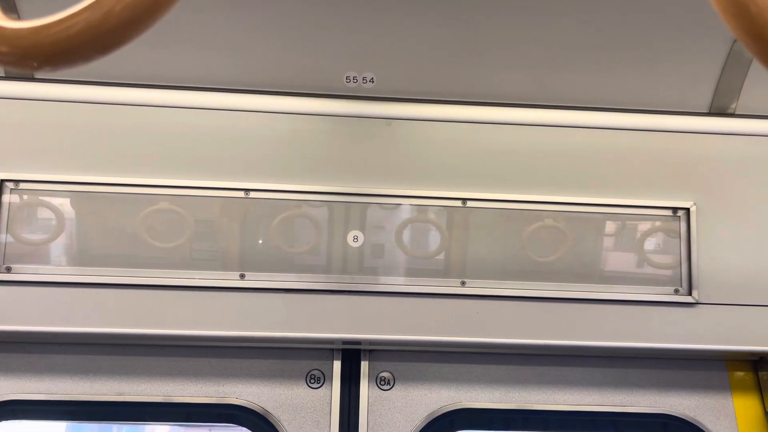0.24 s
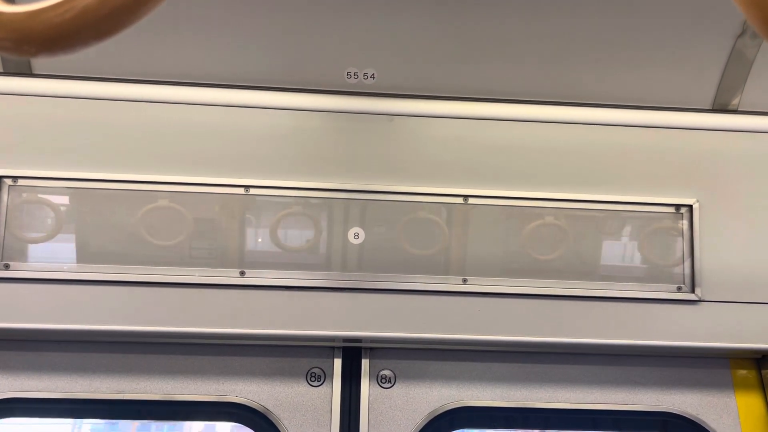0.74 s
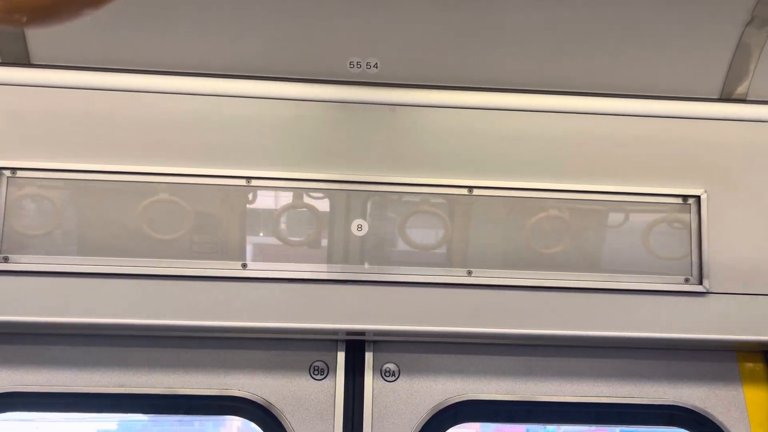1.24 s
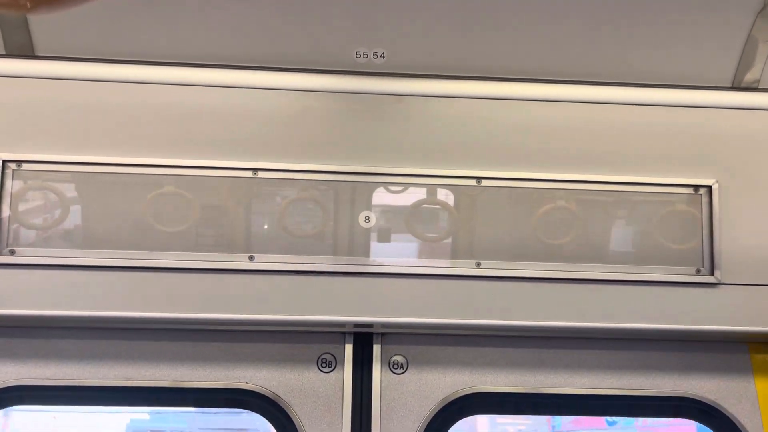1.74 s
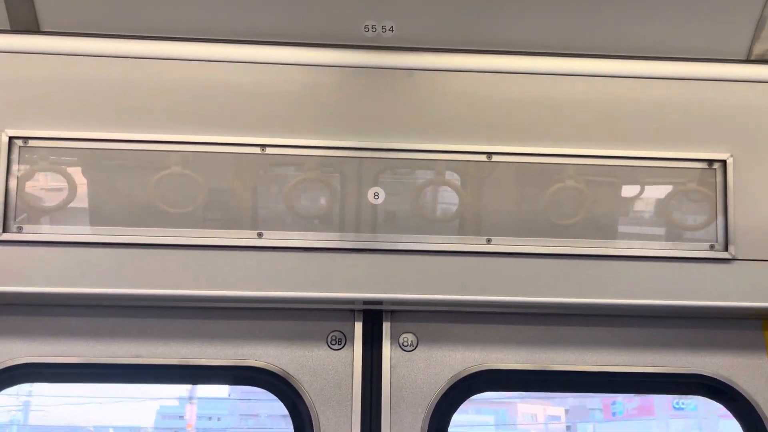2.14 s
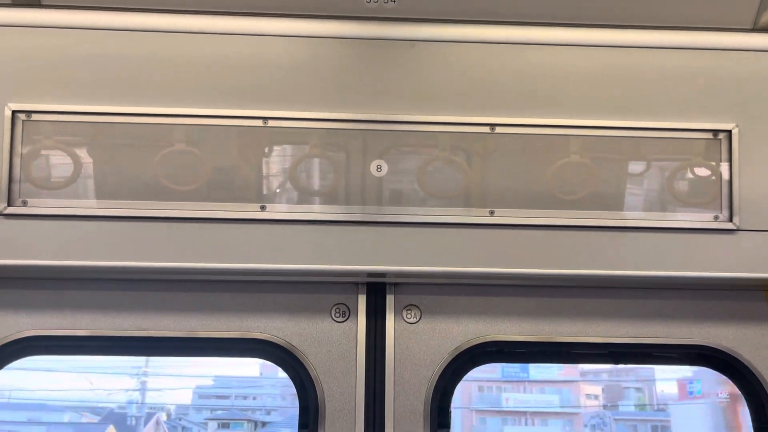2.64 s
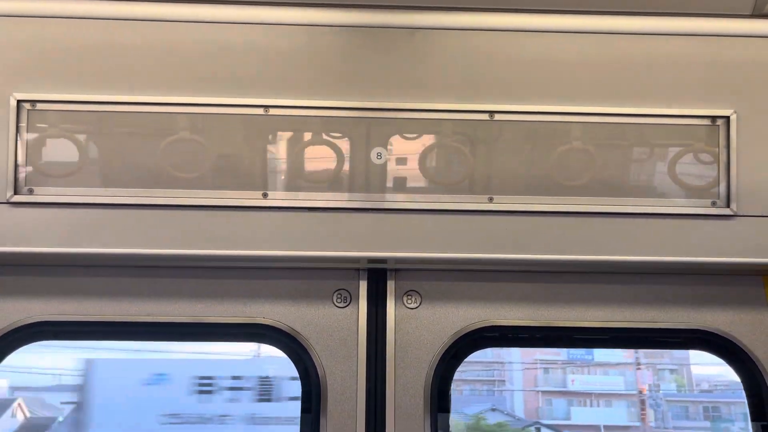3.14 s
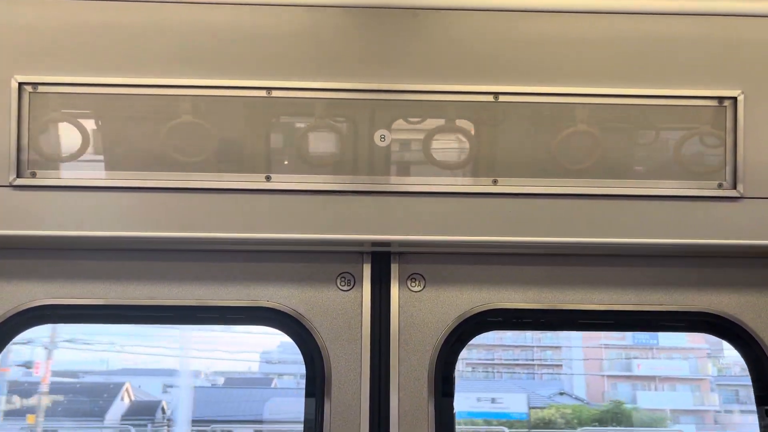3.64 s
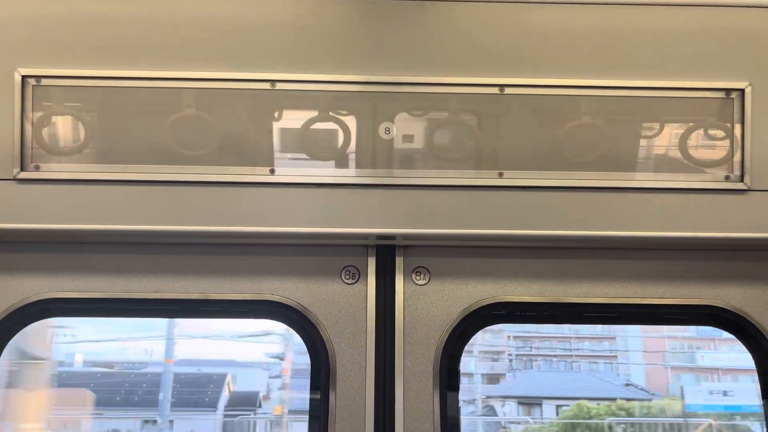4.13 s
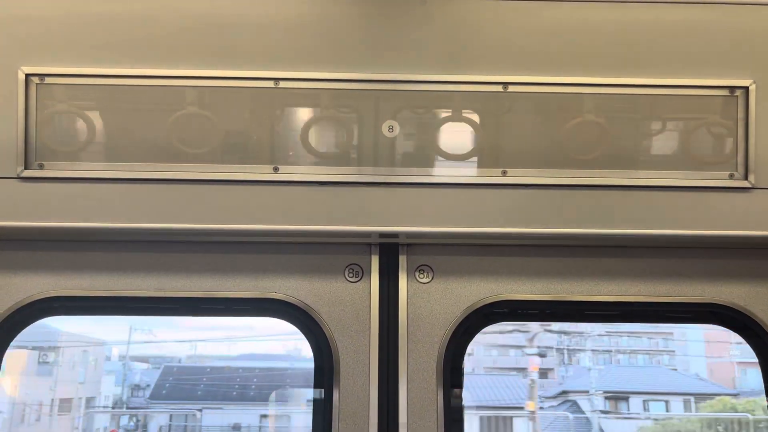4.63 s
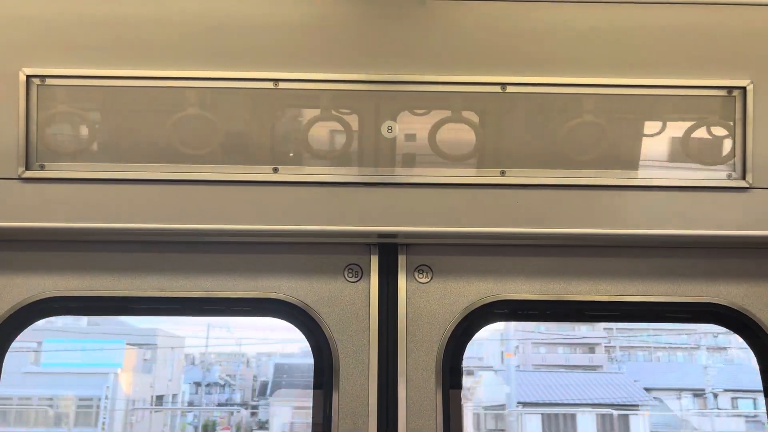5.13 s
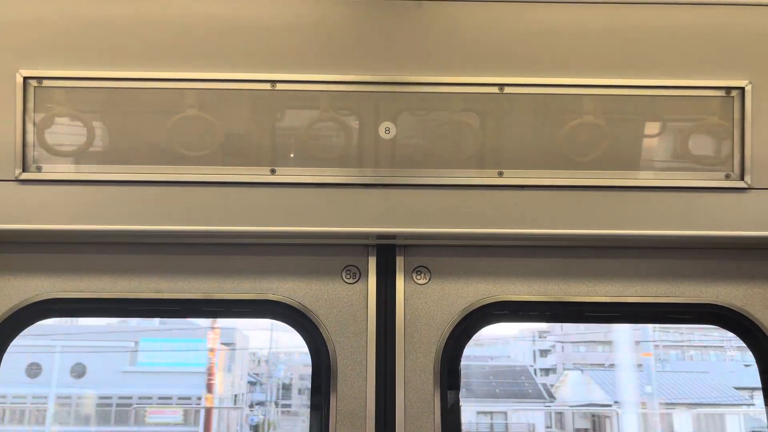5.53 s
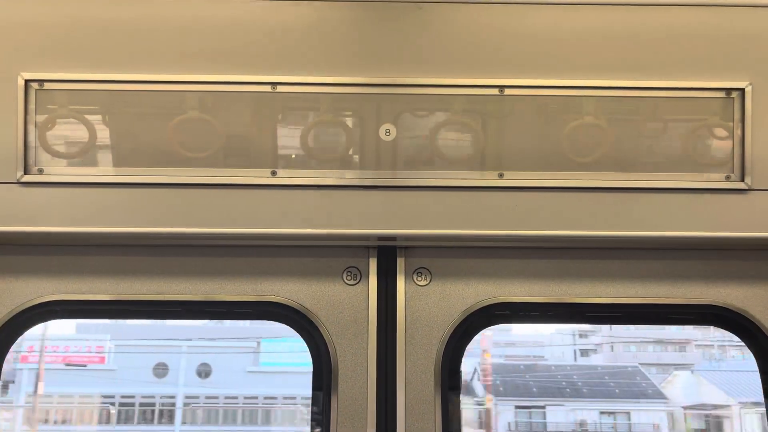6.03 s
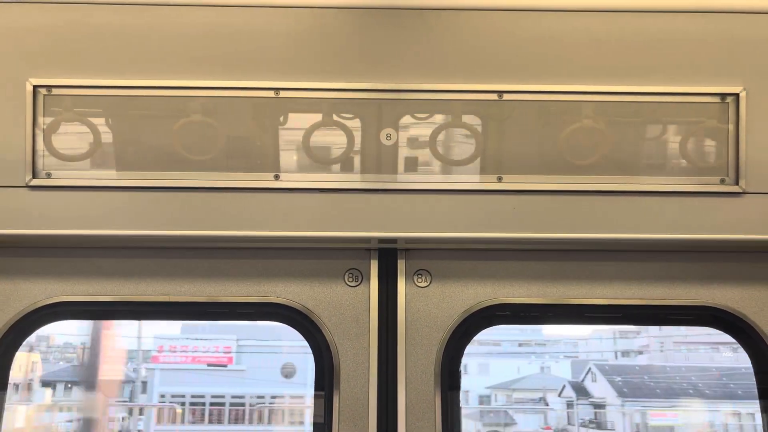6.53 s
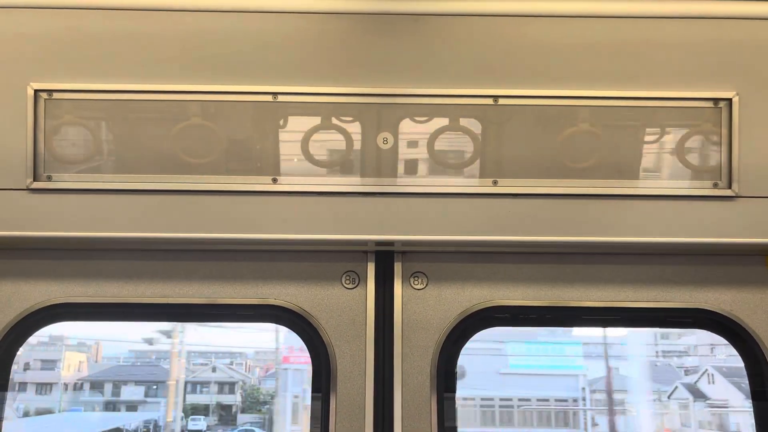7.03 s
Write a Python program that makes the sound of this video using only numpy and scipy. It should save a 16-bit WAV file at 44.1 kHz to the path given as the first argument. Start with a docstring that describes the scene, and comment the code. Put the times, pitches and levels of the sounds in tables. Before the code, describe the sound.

Inside an electric train near the doors, a continuous deep hum around 58 hertz slowly swells and cancels, strongest around 2.4 and 5.5 seconds and weakest near 4.3. Over it, a wavering boom near 100 hertz shakes irregularly, with a strong jolt at 0.7, and wheels roar softly in wide stereo. Dull rail thuds fall at 0.9 and 1.1, faintly again at 5.1. Thin, fluttering hisses appear around 0.8, 1.3 to 1.7, 2.0 to 2.5, 2.8, 3.6 and 4.2 to 4.6, brightening before they die. Tiny metallic clicks cluster with a door rattle near 2.07, then 2.36, 3.9 and 6.8. A faint gear whine climbs steadily, clearer after four seconds. From 5.1 the track roughens: short ringing surges around 5.3, 6.0 and 6.2, then strongest from 6.9 to the abrupt end at 7.3, still rolling.

```python
"""Inside an electric train that gathers speed, by the doors. Two drives beat in a deep, slow hum, a gear whine
climbs, and one wavering tone is the boom of the car body. Filtered noise makes the wheels roar, surge, ring
and swish on the rails, with thin singing strands, a few dull thuds from rail welds, and brief tones that
flare up, mostly towards the end. A thin hiss comes and goes in short spells, ventilation air rushes faintly,
small fittings click now and then, and a door leaf rattles."""
import sys
import numpy as np
from scipy import signal
from scipy.fft import rfft, irfft, next_fast_len
from scipy.io import wavfile
from scipy.ndimage import uniform_filter1d, map_coordinates

SR = 44100
rng = np.random.default_rng(int(sys.argv[2]) if len(sys.argv) > 2 else 0)


def unload_audio(sound):
    """Save the sound as a 16-bit wav file, at the path given as the first command line argument."""
    columns = np.transpose(np.atleast_2d(sound))
    # keep every value between -1 and 1, then stretch to whole-number steps
    steps = np.round(np.clip(columns, -1, 1) * 32767)
    wavfile.write(sys.argv[1], SR, steps.astype(np.int16))


N = 320607

# left-right correlation of the noise: pitch_hz, correlation (-1 to 1)
LEFT_RIGHT_CORRELATION = [(60, 1), (125, 0.88), (250, 0.64), (400, 0.52), (700, .05), (1400, .08),
                          (2800, .27), (5000, 0.32), (6500, .15), (7700, -.65), (8700, -.7), (9700, .1),
                          (11500, .5), (14000, .4)]
# how rough the track is: time_s, roughness (0-1)
TRACK_ROUGHNESS = [(0, 0.16), (4.6, 0), (5.2, 0.4), (5.8, 0.3), (6.7, 0.4), (7.27, 0.9)]
# shaking of the car body, with lulls on smooth rail: time_s, level_db
BODY_SHAKE = [(0, -33.5), (.3, -30), (.55, -29), (.62, -35.5), (.78, -33), (1.0, -28), (1.5, -31.5),
              (1.95, -31), (2.35, -28.5), (2.65, -30), (2.75, -38.5), (2.85, -27.5), (3.15, -30.5),
              (3.75, -31.5), (4.4, -29), (4.51, -44), (4.58, -27.5), (4.69, -35.5), (4.8, -28), (5.1, -28),
              (5.55, -26.5), (5.75, -31), (5.88, -34.5), (6.02, -27), (6.45, -31), (6.58, -31.5),
              (6.7, -29), (7.27, -29)]
# rough stretches of rail: middle_s, half_length_s, level_db
ROUGH_STRETCHES = [(.95, 0.053, -42), (5.26, .06, -38), (5.995, 0.057, -36), (6.17, 0.076, -39),
                   (6.88, 0.09, -37), (7.01, .05, -34.5), (7.12, 0.061, -34.5)]


def amp(db):
    """Turn decibels into a gain."""
    return 10 ** (np.asarray(db) / 20)


def unit(x):
    """Scale to an average strength (rms) of 1."""
    return x / np.sqrt(np.mean(x ** 2) + 1e-20)


def along(points, hz):
    """Read a (Hz, value) table at any pitch, on a log pitch axis as the ear hears it."""
    table_hz, values = np.transpose(points)
    return np.interp(np.log(hz + 1), np.log(table_hz + 1), values)


def curves(rows):
    """Turn a table that starts with time into one smooth-running value per sample for each other column."""
    time_s, *columns = np.transpose(rows)
    return [np.interp(np.arange(N) / SR, time_s, column) for column in columns]


def wobble(rate):
    """A smooth random curve around zero, with this many random points a second."""
    points = rng.standard_normal(int(N * rate / SR) + 4)
    return map_coordinates(points, [np.arange(N) * rate / SR])


def filtered(x, response):
    """Strengthen or weaken each frequency of x by the given response."""
    size = next_fast_len(N + SR // 2)
    spectrum = rfft(x, size) * response(np.fft.rfftfreq(size, 1 / SR))
    return irfft(spectrum, size)[..., :N]


def lift(peaks, hz):
    """Decibels that resonances add at a pitch, from (Hz, width Hz, lift dB) rows."""
    return sum(db / (1 + (2 * (hz - centre) / width) ** 2) for centre, width, db in peaks)


def swells(rows):
    """Loudness curve of bell-shaped swells, one per (s, half length s, dB) row."""
    t = np.arange(N) / SR
    return sum(amp(db) * np.exp(-((t - s) / half) ** 2) for s, half, db in rows)


def tone(hz):
    """A pure tone of rms 1 that follows a pitch curve."""
    return np.sqrt(2) * np.sin(2 * np.pi * np.cumsum(hz) / SR)


def rush(spectrum, patchy_db, peaks=()):
    """Noise spread over left and right, with resonances and drifting patches; its middle has rms 1."""
    grid = signal.stft(rng.standard_normal((2, N)), nperseg=1024)[2]
    # random patches, smoothed over neighbouring pitches and then over time
    patches = uniform_filter1d(rng.standard_normal(grid.shape[1:]), size=5, axis=0)
    patches = uniform_filter1d(patches, size=12, axis=1)
    pair = signal.istft(grid * amp(patchy_db * unit(patches)), nperseg=1024)[1][:, :N]

    def colour(hz):
        # this angle shares the noise between middle and side to give the left-right correlation
        turn = np.arccos(np.clip(along(LEFT_RIGHT_CORRELATION, hz), -1, 1)) / 2
        roll_off = np.maximum(hz / spectrum[-1][0], 1) ** -4
        tint = roll_off * amp(along(spectrum, hz) + lift(peaks, hz))
        return tint * [np.cos(turn), np.sin(turn)]

    mid, side = filtered(pair, colour)
    return np.array([mid + side, mid - side]) / np.std(mid)


def combed(x):
    """Standing waves in the cabin give each ear its own fine, fixed ripple over pitch; the level is kept."""
    spacing_hz, depth_db = 22, 1.8
    points = rng.standard_normal((2, int(SR / spacing_hz)))

    def ripple(hz):
        return amp(depth_db * np.array([map_coordinates(ear, [hz / spacing_hz]) for ear in points]))

    return unit(filtered(x, ripple)) * np.std(x)


def blows(rows, crack_t60, ring_t60, ring_db, attack_s):
    """Loudness curve of small impacts: a quick rise, a crack, then the cabin's short answer."""
    t = np.arange(SR // 3) / SR
    envelope = np.zeros(N + SR)
    # each t60 is the time in seconds to fall by 60 dB
    crack = amp(-60 * t / crack_t60)
    answer = amp(ring_db - 60 * t / ring_t60)
    shape = (1 - np.exp(-t / attack_s)) * np.hypot(crack, answer)
    for s, db in rows:
        envelope[round(s * SR):][:len(t)] += amp(db) * shape
    return envelope[:N]


def ventilation():
    """Air rushes faintly: broad noise that wavers only a little."""
    # colour of the moving air: pitch_hz, level_db (per Hz)
    air_spectrum = [(1000, -20), (3000, 4), (4700, 6), (7000, 2.5), (8300, 2), (9600, 2.5), (11000, -1),
                    (12200, -2), (15500, -13)]
    level_db = -71
    return amp(level_db + .6 * wobble(12)) * rush(air_spectrum, patchy_db=.5)


def hiss_spells():
    """Spells of thin, fluttering hiss open, hold, turn fizzier and die away."""
    # spells of hiss: start_s, length_s, body_db, fizz_db, fizz_crest (share of the spell, 0-1)
    spells = [(-.2, 0.19, -57.5, -77.5, 0.5), (0.817, .21, -61, -75.5, .6), (1.267, 0.2, -64.5, -77, 0.9),
              (1.474, 0.27, -62, -69, .6), (2.043, 0.5, -61, -65.5, .62), (2.821, 0.27, -60.5, -69.5, 0.7),
              (3.604, 0.3, -61, -71.5, .85), (4.217, 0.37, -61.5, -68, .74), (7.172, .2, -66, -75, 0.6)]
    # colour of the hiss body: pitch_hz, level_db (per Hz)
    body_spectrum = [(2500, -34), (4100, -6), (4600, 0), (5400, 1.5), (5950, 2.5), (6200, -6), (6600, -6),
                     (7400, -14.5), (9000, -47.5)]
    # colour of the brighter fizz: pitch_hz, level_db (per Hz)
    fizz_spectrum = [(4000, -20), (6800, -1), (8300, -.5), (9400, 1.5), (11000, 1.5), (13000, -.5),
                     (15500, -5)]
    # faint strands in the hiss: pitch_hz, width_hz, lift_db
    hiss_strands = [(4545, 40, 3), (4628, 30, 2), (4825, 35, 3), (5080, 40, 4), (5276, 30, 2.5),
                    (5430, 60, 3), (5845, 40, 2), (5945, 50, 4), (6114, 25, 3), (6380, 50, 4)]
    # faint whistles in the fizz: pitch_hz, width_hz, lift_db
    whistles = [(7707, 70, 8), (9350, 350, 4), (11175, 60, 9)]
    attack_s, release_db_per_s = .065, 106.5
    fizz_width = .5  # how broadly the fizz crests, as a share of the spell
    flutter_db = .7

    t = np.arange(N) / SR
    hiss_body = combed(rush(body_spectrum, patchy_db=.8, peaks=hiss_strands))
    fizz = combed(rush(fizz_spectrum, patchy_db=.8, peaks=whistles))
    hiss = np.zeros((2, N))
    for start, length, body_db, fizz_db, crest_at in spells:
        age = t - start
        opening = np.clip(age / attack_s, 0, 1)
        dying = amp(-release_db_per_s * np.maximum(age - length, 0))
        crest = np.exp(-((age / length - crest_at) / fizz_width) ** 2)
        hiss += opening * dying * (amp(body_db) * hiss_body + crest * amp(fizz_db) * fizz)
    return amp(flutter_db * wobble(35)) * hiss


def fittings():
    """Light fittings snap and ring; a door leaf rattles against its frame with a lower, softer note."""
    # clicks of the fittings: time_s, snap_db, ring_db
    clicks = [(1.3886, -62, -66), (1.8878, -57, -68), (2.0394, -58, -67), (2.056, -62, -64),
              (2.0694, -51, -55.5), (2.3615, -48, -59.5), (3.9032, -54, -66), (5.6722, -61, -68),
              (6.609, -60, -65), (6.6943, -64, -65), (6.7188, -61, -63.5), (6.7946, -48, -53.5),
              (6.807, -56, -60)]
    # knocks of the door leaf: time_s, level_db
    door_knocks = [(2.064, -53), (2.077, -56), (6.7946, -60)]
    # colour of the clicks: pitch_hz, level_db (per Hz)
    click_spectrum = [(2000, -20), (5000, -4), (8000, -3), (9700, 0), (11300, 0), (13000, -2.5),
                      (15500, -7)]
    # colour of the door knocks: pitch_hz, level_db (per Hz)
    knock_spectrum = [(1000, -22), (2700, -6), (3400, 1), (4600, 1), (6000, -2), (8000, -8), (14000, -18)]
    # resonances of the fittings: pitch_hz, width_hz, lift_db
    fitting_resonances = [(5060, 200, 11), (10000, 500, 4.5), (11200, 790, 11.5)]

    s, snap_db, tail_db = np.transpose(clicks)
    snap_shape = blows(zip(s, snap_db), crack_t60=.005, ring_t60=.03, ring_db=-22, attack_s=.0001)
    ring_shape = blows(zip(s, tail_db), crack_t60=.03, ring_t60=.22, ring_db=-7, attack_s=.0005)
    knock_shape = blows(door_knocks, crack_t60=.05, ring_t60=.25, ring_db=-6, attack_s=.002)
    snaps = snap_shape * rush(click_spectrum, patchy_db=.5)
    rings = ring_shape * rush(click_spectrum, patchy_db=1.5, peaks=fitting_resonances)
    knocks = knock_shape * rush(knock_spectrum, patchy_db=2.5)
    return snaps + rings + knocks


def welds():
    """The wheels cross rail welds, and the springs soften each blow into a dull thud."""
    # blows before the springs soften them: time_s, level_db
    weld_blows = [(.91, -38.5), (1.14, -33.5), (5.1, -41.5)]
    # colour of the thuds: pitch_hz, level_db (per Hz)
    thud_spectrum = [(120, -19), (200, 0.5), (255, 5), (315, 6), (390, -15.5), (650, -16), (900, -24)]
    push = blows(weld_blows, crack_t60=0.3, ring_t60=0.6, ring_db=-6, attack_s=.002)
    softened = uniform_filter1d(push, size=400)  # averaged over about 9 ms
    return softened * rush(thud_spectrum, patchy_db=5.0)


def strands():
    """Single wheel modes sing in thin, wavering strands that come and go, more at speed and on rough rail."""
    # singing modes of the wheels: pitch_hz, relative_level_db
    wheel_modes = [(1448, 0), (1480, -1), (1540, -1), (1925, -3), (1981, 0), (2050, -4), (2915, -7)]
    start_db, rise_db_per_s = -75, 1
    surge_db = -29  # share of each rough stretch
    waver_db, wander_hz = 4, 7  # unsteadiness of strength and pitch

    t = np.arange(N) / SR
    level = amp(start_db + rise_db_per_s * t) + amp(surge_db) * swells(ROUGH_STRETCHES)
    out = np.zeros((2, N))
    for hz, db in wheel_modes:
        pitch = hz + wander_hz * wobble(9)
        for ear in out:
            strength = amp(db) * unit(amp(waver_db * wobble(13)))
            ear += strength * tone(pitch + 4 * wobble(30))
    return level * out


def wheel():
    """The wheels ring and swish, louder as the train gathers speed; rough track adds to the ringing."""
    # colour of the ringing: pitch_hz, level_db (per Hz)
    ring_spectrum = [(1500, -28), (1800, -12), (1910, 0), (1985, 3.5), (2070, -2.5), (2170, -13.5),
                     (2500, -35.5)]
    # colour of the swish on the rail: pitch_hz, level_db (per Hz)
    swish_spectrum = [(2000, -23.5), (3500, 3), (4900, 3.5), (6000, -1.5), (7500, -30)]
    ring_db, ring_rise_db_per_s = -64.5, 0.27  # on smooth track at the start; growth with speed
    ring_grows_db, ring_surge_db = 2, -34  # added on the roughest track; share of each rough stretch
    ring_waver_db = 2.2
    swish_db, swish_rise_db_per_s = -76, 1.14  # at the start; growth with speed

    rough, = curves(TRACK_ROUGHNESS)
    t = np.arange(N) / SR
    level = amp(ring_db + ring_rise_db_per_s * t + ring_grows_db * rough)
    level = level + amp(ring_surge_db) * swells(ROUGH_STRETCHES)
    ring = level * amp(ring_waver_db * wobble(8)) * rush(ring_spectrum, patchy_db=1.8)
    swish = amp(swish_db + swish_rise_db_per_s * t) * rush(swish_spectrum, patchy_db=3.7)
    return ring + swish


def flares():
    """Uneven rail drives resonances of the running gear into short, wavering tones, spread over left and right."""
    # brief tones: middle_s, half_length_s, pitch_hz, level_db
    brief_tones = [(0.836, 0.037, 634, -46.5), (0.933, 0.039, 317.7, -44), (0.966, 0.021, 220, -36),
                   (1.026, .08, 650, -48.5), (1.159, 0.028, 222.6, -33.5), (1.337, 0.056, 320, -41.5),
                   (3.715, 0.064, 152, -33.5), (4.504, 0.044, 394, -42), (4.84, .05, 420.5, -42.5),
                   (5.13, 0.062, 239.6, -38.5), (5.27, 0.03, 392, -37), (5.3, 0.097, 441, -45.5),
                   (5.34, 0.036, 215.3, -35.5), (5.607, 0.025, 204.7, -35), (5.99, 0.029, 403, -39.5),
                   (5.966, 0.1, 428.6, -41.5), (6.182, 0.11, 431, -38.5), (6.904, 0.069, 432, -39.5),
                   (6.916, 0.039, 390, -35.5), (7.02, .035, 391, -35), (7.032, 0.027, 330, -36),
                   (7.123, 0.03, 388.5, -32.5), (7.13, .04, 591, -44), (7.136, .05, 76, -29.5),
                   (7.214, .04, 202.8, -34.5)]
    wander = .006  # unsteadiness of pitch, as a share
    flutter_db = 1.5  # unevenness of strength

    def wavering(hz):
        strength = amp(flutter_db * wobble(35))
        return strength * tone(hz * (1 + wander * wobble(40)))

    out = np.zeros((2, N))
    for s, half, hz, db in brief_tones:
        turn = np.arccos(along(LEFT_RIGHT_CORRELATION, hz)) / 2
        mid = np.cos(turn) * wavering(hz)
        side = np.sin(turn) * wavering(hz)
        out += swells([(s, half, db)]) * np.array([mid + side, mid - side])
    return out


def rolling():
    """Rail roughness rumbles in the shaking floor, drones in the rail, rings the wheels and makes them sing."""
    # colour of the floor rumble: pitch_hz, level_db (per Hz)
    rumble_spectrum = [(20, -10.5), (32, -19.5), (45, 2), (70, 4.5), (85, 4.5), (118, 11), (134, 0.5),
                       (148, 5), (163, -1.5), (180, -4.5), (212, -4), (275, -9), (340, -13.5), (450, -13),
                       (900, -78)]
    # colour of the rail drone: pitch_hz, level_db (per Hz)
    drone_spectrum = [(250, -28), (330, 19), (392, 17), (440, 7), (480, 5), (560, -48)]
    # colour of the wheel roar: pitch_hz, level_db (per Hz)
    roar_spectrum = [(200, -2.5), (400, -16), (520, 1.5), (610, 0.5), (720, -2.5), (900, -4), (1100, -4.5),
                     (1400, -7.5), (1590, -10), (1700, -12), (1850, -13), (2300, -17.5), (3600, -21),
                     (4200, -24), (4800, -27), (6500, -41.5), (12000, -159)]
    # colour of the rough stretches: pitch_hz, level_db (per Hz)
    rough_spectrum = [(120, -33), (220, 0), (330, 0), (450, -5.5), (490, -11.5), (620, -7), (900, -16),
                      (1400, -26.5), (2400, -47.5), (4000, -46.5)]
    # ringing of wheels and rail: pitch_hz, width_hz, lift_db
    wheel_resonances = [(1470, 80, 3.5), (2740, 400, 4.5), (2970, 80, 3), (4770, 140, 6.5)]
    # floor and wall panels that colour the roar: pitch_hz, width_hz, lift_db
    panel_resonances = [(504, 20, 3.5), (590, 34, 3), (636, 32, 2), (710, 20, 3.5), (780, 24, 3),
                        (872, 30, 1.5), (1020, 30, 3.5), (1106, 30, 2), (1380, 40, 0.5), (1630, 48, 2.5)]
    # rail and wheels singing on rough track: pitch_hz, width_hz, lift_db
    singing_resonances = [(397, 18, 7), (430, 13, 11.5), (506, 30, 3), (600, 21, 3.5), (1490, 90, 14.5),
                          (1985, 110, 5.5), (2900, 70, 9.5)]
    rumble_db, roar_db, drone_db = -30, -47, -48  # on smooth track
    rumble_grows_db, roar_grows_db = 4, 4  # added on the roughest track; the drone grows like the roar
    rumble_follows = 0.35  # dB of rumble per dB of shaking
    rumble_waver_db = 0.5

    rough, = curves(TRACK_ROUGHNESS)
    shake_db, = curves(BODY_SHAKE)
    growth_db = roar_grows_db * rough
    floor_db = rumble_db + rumble_grows_db * rough + rumble_follows * (shake_db - shake_db.mean())
    rumble = amp(floor_db + rumble_waver_db * wobble(10)) * rush(rumble_spectrum, patchy_db=0.58)
    drone = amp(drone_db + growth_db) * rush(drone_spectrum, patchy_db=3.1)
    roar_noise = rush(roar_spectrum, patchy_db=1.5, peaks=wheel_resonances + panel_resonances)
    roar = amp(roar_db + growth_db) * roar_noise
    surge_noise = rush(rough_spectrum, patchy_db=-0.5, peaks=singing_resonances)
    surges = swells(ROUGH_STRETCHES) * surge_noise
    return rumble + drone + roar + surges


def body():
    """Uneven track shakes one narrow resonance of the car body: its pitch and strength waver; jolts swell it."""
    # slow drift of the resonance: time_s, pitch_hz
    boom_pitch = [(0, 104), (.5, 98), (1.0, 103), (2.0, 102), (3.3, 100), (4.3, 102), (4.9, 106),
                  (5.5, 104), (6.05, 98), (6.45, 103), (7.27, 100)]
    # jolts that swell the boom: middle_s, half_length_s, level_db
    jolts = [(.48, 0.027, -27.5), (.69, 0.016, -17.5), (1.05, 0.093, -25.5), (1.22, 0.027, -20.5),
             (1.88, .07, -29.5), (2.68, 0.022, -28.5), (3.26, 0.015, -27), (4.18, 0.018, -24.5),
             (4.38, 0.037, -30.5), (4.93, 0.14, -29), (5.42, 0.019, -30), (7.03, 0.017, -26),
             (7.21, 0.025, -24)]
    throb_db = 2.6  # depth of the throbbing
    wander_hz = 2  # slower unsteadiness around the drift

    shake_db, = curves(BODY_SHAKE)
    centre_hz, = curves(boom_pitch)
    throb = unit(amp(throb_db * wobble(20)))
    hz = centre_hz + wander_hz * wobble(8) + 3.2 * wobble(30)
    return (amp(shake_db) * throb + swells(jolts)) * tone(hz)


def drive_hum():
    """Two drives hum at almost one pitch, so they slowly drift between adding up and cancelling."""
    # lead of one drive over the other, cancelling at whole numbers: time_s, lead_cycles
    drive_lead = [(0, 0.067), (.8, 0.2), (1.08, 0.16), (1.3, 0.38), (2.4, 0.55), (3.4, 0.78), (4.25, .92),
                  (4.48, 0.88), (4.65, 1.14), (5.0, 1.2), (5.45, 1.44), (7.27, 1.69)]
    # brief dips of the hum: middle_s, half_length_s, part_lost_db
    hum_dips = [(1.08, .05, -13), (3.945, .04, -4), (4.43, .035, -4), (7.055, 0.03, -4)]
    hum_hz, hum_db = 58.3, -25.5  # middle pitch; level of the first drive
    second_drive_db, waver_db = -.4, .6  # second drive relative to the first; unsteadiness of each

    lead, = curves(drive_lead)
    phase = 2 * np.pi * np.cumsum(hum_hz + .08 * wobble(3.6)) / SR
    first = amp(waver_db * wobble(12)) * np.sin(phase + np.pi * lead)
    second = amp(second_drive_db + waver_db * wobble(16)) * np.sin(phase - np.pi * lead)
    return amp(hum_db) * np.sqrt(2) * (1 - swells(hum_dips)) * (first - second)


def gear_whine():
    """The meshing gear teeth whine at a steadily climbing pitch, louder as it passes through resonances."""
    # resonances that the whine climbs through: pitch_hz, width_hz, lift_db
    gear_resonances = [(343, 8.9, 3.5), (377.7, 11, 8.5), (392, 3, 5), (406.4, 8.8, 7.5), (426, 12, 12)]
    start_hz, rise_hz_per_s = 296, 21.3
    level_db = -56.5  # away from any resonance
    gear_hz = start_hz + rise_hz_per_s * np.arange(N) / SR
    strength = amp(lift(gear_resonances, gear_hz) + 1.8 * wobble(14))
    return amp(level_db) * strength * tone(gear_hz + 1.5 * wobble(25))


def placed(x):
    """Bass leans to the right and reaches it first; higher sounds lean left or right depending on pitch."""
    # how much louder left is than right: pitch_hz, left_minus_right_db
    lean = [(60, -0.9), (180, -1.5), (350, -2), (700, -0.6), (1500, -1), (2800, 3), (5200, 5), (9000, -4),
            (14000, 3.5)]
    # how far left runs ahead of right (negative: behind): pitch_hz, lead_radians
    left_lead = [(60, -0.22), (110, -0.19), (260, -0.49), (800, -0.015)]

    def response(hz):
        half = np.array([[.5], [-.5]])  # left gets plus half, right minus half
        return amp(half * along(lean, hz)) * np.exp(1j * half * along(left_lead, hz))

    return filtered(x, response)


def scene():
    """Everything as heard by the doors."""
    background = ventilation() + hiss_spells() + fittings()
    rails = welds() + strands() + wheel() + flares() + rolling()
    train = body() + drive_hum() + gear_whine()
    return placed(background + rails + train)


def record(dry):
    """Fade the start and end over 2 ms to avoid clicks, and keep nothing above the top pitch."""
    top_hz = 14700
    t = np.arange(N) / SR
    fade = np.clip(np.minimum(t, t[-1] - t) / .002, 0, 1)
    return filtered(fade * dry, lambda hz: hz < top_hz)


dry = scene()
out = record(dry)
unload_audio(out)
```